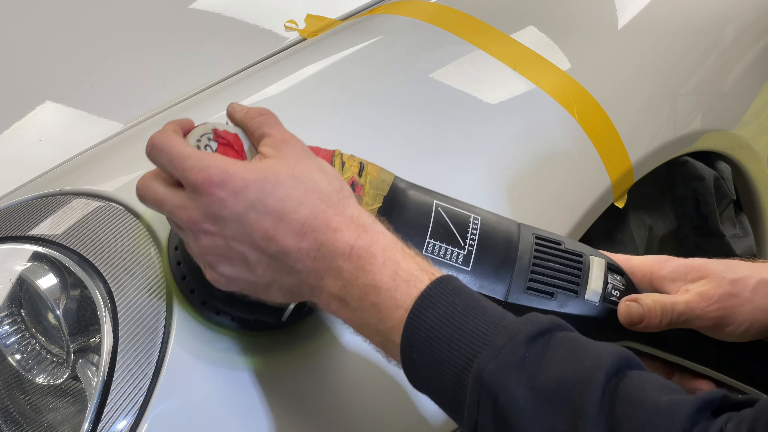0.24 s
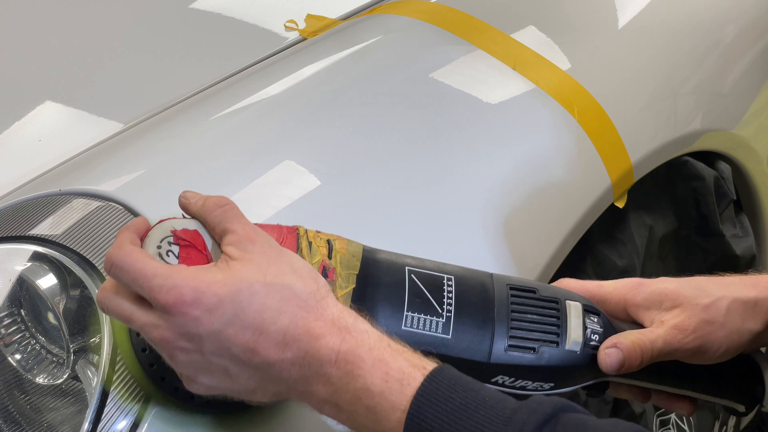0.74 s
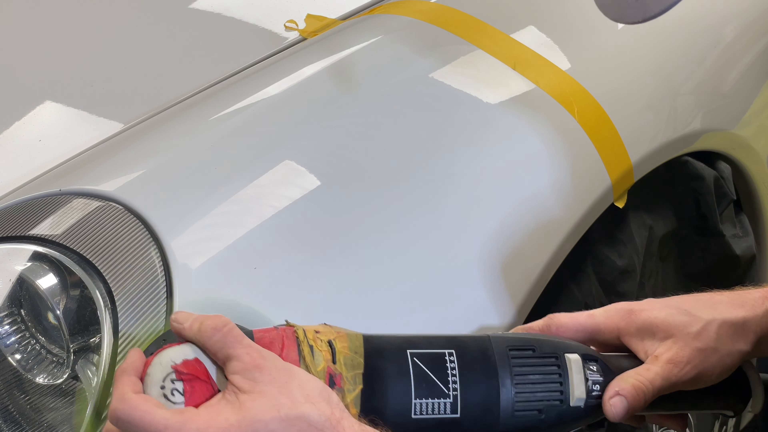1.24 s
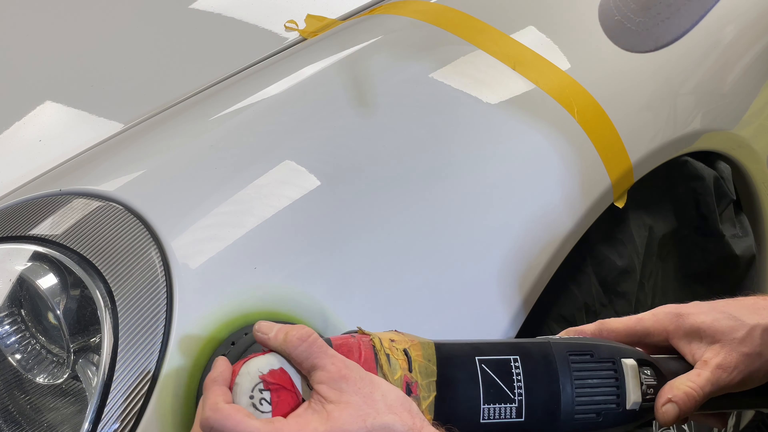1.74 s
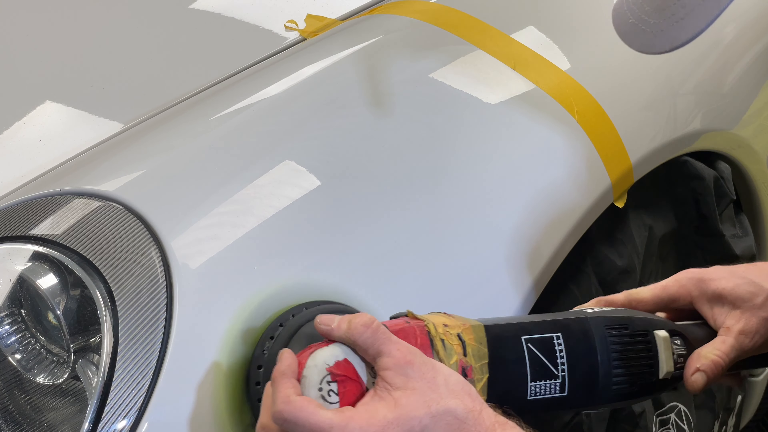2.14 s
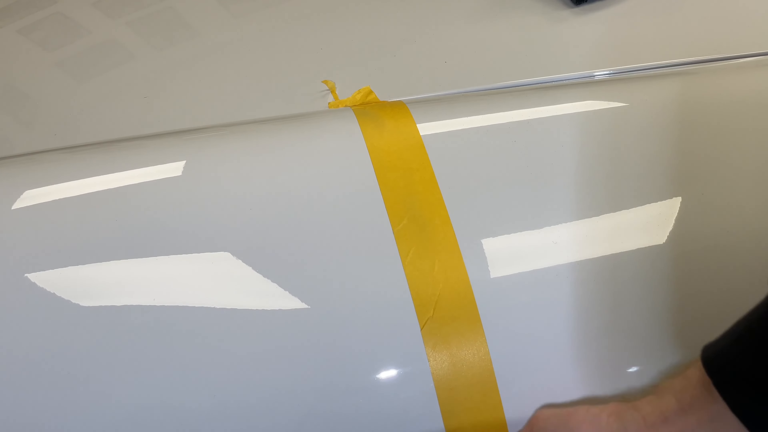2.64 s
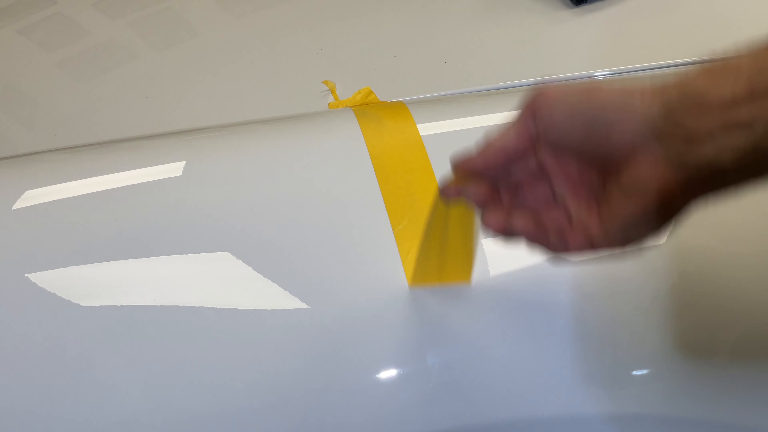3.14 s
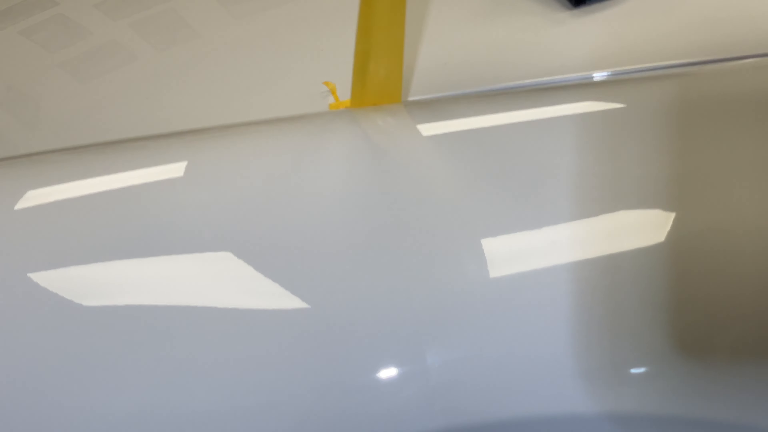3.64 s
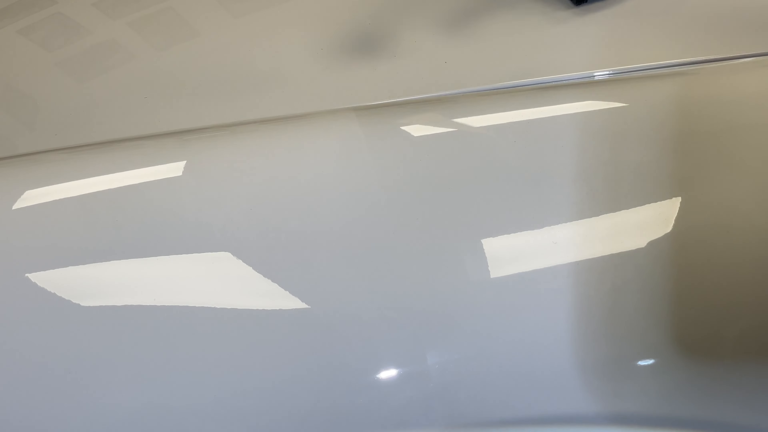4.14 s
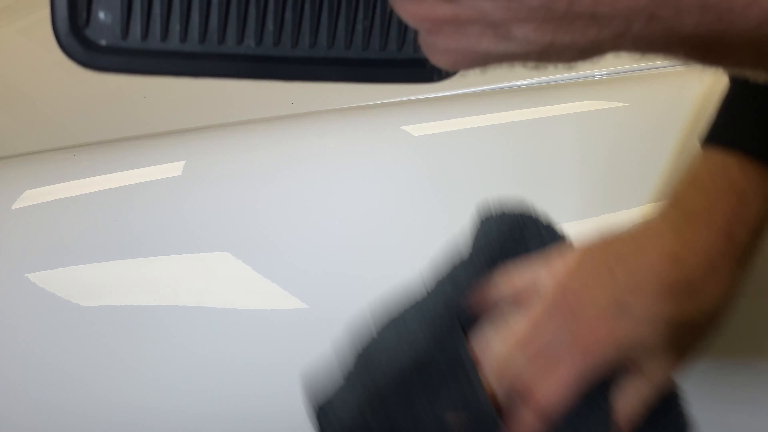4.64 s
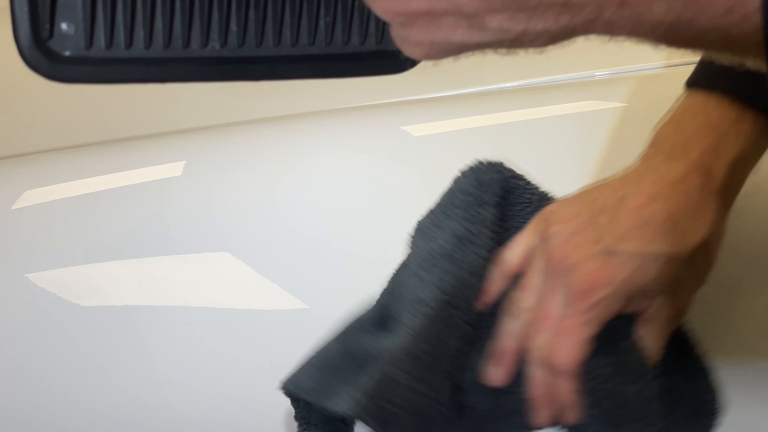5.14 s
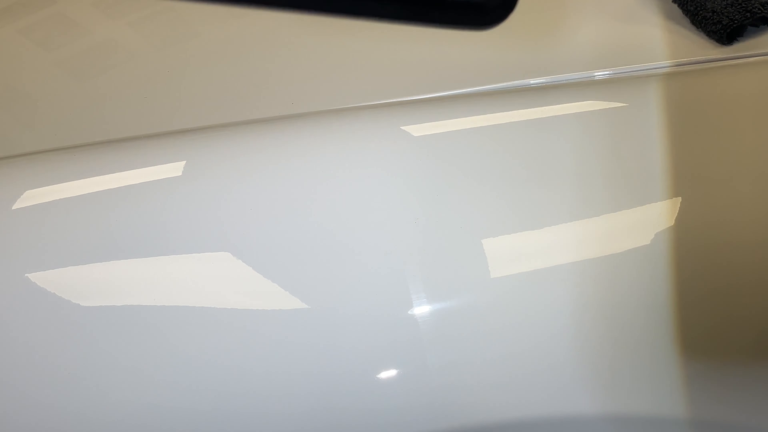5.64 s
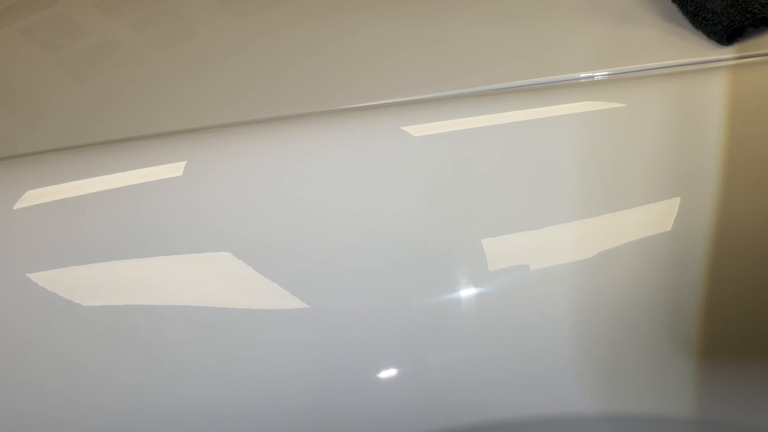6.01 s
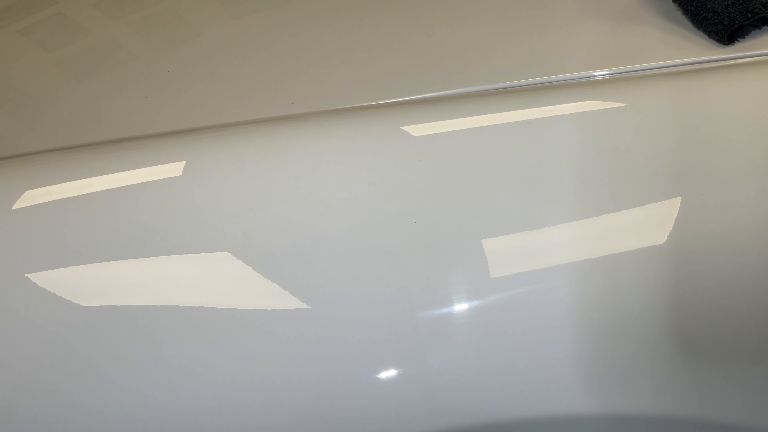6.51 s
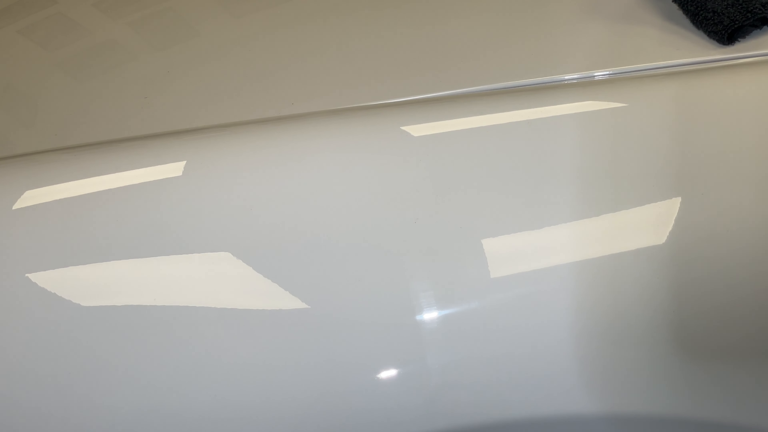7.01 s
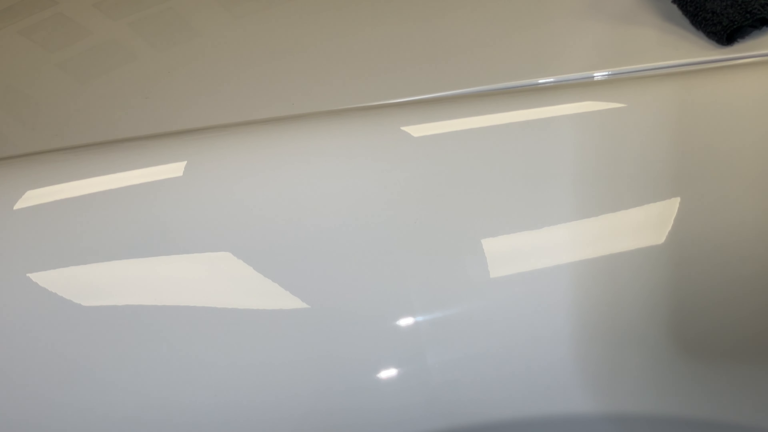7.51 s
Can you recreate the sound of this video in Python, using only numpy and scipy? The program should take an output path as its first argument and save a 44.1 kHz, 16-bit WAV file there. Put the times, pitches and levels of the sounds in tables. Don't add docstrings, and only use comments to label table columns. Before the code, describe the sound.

Steady geared whine of a car polisher stops dead, giving way to crackling tape peel, booming sheet metal, soft cloth strokes and crisp film crumpling.

```python
import sys
import numpy as np
from scipy import signal
from scipy.fft import rfft, irfft, next_fast_len
from scipy.io import wavfile
from scipy.ndimage import uniform_filter1d

SR = 44100
rng = np.random.default_rng(int(sys.argv[2]) if len(sys.argv) > 2 else 0)


def boost(x):
    u = np.asarray(x, float) / 20
    return 10 ** u


def store_pcm(level_fs):
    pcm = np.round(np.clip(level_fs, -1, 1) * 32767).astype(np.int16)
    wavfile.write(sys.argv[1], SR, np.atleast_2d(pcm).T)


N = 342657
TIME = np.arange(N) / SR
CUT_S = 2.245, 2.272
TAPE_S = 2.275, 4.24
PINION_TEETH, WHEEL_TEETH = 9, 43
PULSE_HZ = 99.85


def in_time(rows):
    s, *columns = np.transpose(rows)
    return [np.interp(TIME, s, c) for c in columns]


def window(span, fade_s=0.0046):
    return np.clip(np.minimum(TIME - span[0], span[1] - TIME) / fade_s + 0.5, 0, 1)


def at_hz(points, hz):
    point_hz, value = np.transpose(points)
    return np.interp(np.log(hz), np.log(point_hz), value)


def rms_one(x):
    return x / np.sqrt(np.mean(x ** 2) + 1e-20)


def drift(rate):
    r = np.exp(-128 * np.pi * rate / SR)
    slow = signal.lfilter([1], [1, -2 * r, r * r], rng.standard_normal(N // 64 + 1502))[1500:]
    return np.interp(np.arange(N) / 64, np.arange(len(slow)), rms_one(slow - slow.mean()))


def band_noise(order, band_hz):
    band_pass = signal.butter(order, band_hz, "band", fs=SR, output="sos")
    return rms_one(signal.sosfilt(band_pass, rng.standard_normal(N)))


def coloured(source, spectrum, shift_hz, shifts_db, patchy_db, level_band, span=(0, None)):
    out, power = np.zeros(N), 0
    edges = 28 * 2 ** np.arange(0, 9.4, 1 / 3)
    part = slice(*np.searchsorted(TIME, span)) if span[1] else slice(None)
    for k, (low, high) in enumerate(zip(edges, edges[1:])):
        hz = np.sqrt(low * high)
        band_pass = signal.butter(2, [low, high], "band", fs=SR, output="sos")
        band = boost(at_hz(spectrum, hz)) * signal.sosfilt(band_pass, source[k % 2, part])
        power += np.mean(band ** 2) * (level_band[0] < hz < level_band[1])
        place = np.interp(np.log(hz), np.log(shift_hz), range(len(shift_hz)))
        shift = sum(max(0, 1 - abs(place - i)) * s[part] for i, s in enumerate(shifts_db))
        out[part] += band * boost(shift + patchy_db * drift(17.0)[part])
    return out / np.sqrt(power)


def resonance(x, hz, width_hz):
    r = np.exp(-np.pi * width_hz / SR)
    poles = [1, -2 * r * np.cos(2 * np.pi * hz / SR), r * r]
    return signal.lfilter([(1 - r * r) / 2, 0, (r * r - 1) / 2], poles, x)


def tones(turn, orders, waver_db, blur=0.46, blur_hz=8.9):
    run, out = slice(int(CUT_S[1] * SR)), np.zeros(N)
    for k, db in orders:
        level = np.sqrt(2) * boost(db + waver_db * drift(1.9)[run])
        start = rng.uniform(0, 2 * np.pi)
        out[run] += level * np.sin(k * turn[run] + start + blur * drift(blur_hz)[run])
    return out


# (time [s], pitch [Hz])
MESH_SPEED = [(0, 2918), (.2, 2936), (.35, 2935), (.5, 2930), (.7, 2928), (.9, 2932), (1.1, 2925),
              (1.35, 2918), (1.6, 2923), (1.75, 2930), (2, 2924), (2.3, 2924)]
# (time [s], mesh [dB], vents turned away [dB], flank turned near [dB])
TOOL_MOVES = [(0.0, -36.5, -1.5, -6), (.15, -31, -1, -2.5), (.25, -30, -3.5, -8), (0.34, -26.5, 0.5, -7),
              (.52, -28, 0, -2), (0.8, -25.5, -2, -3.5), (0.92, -30.5, -4, 2), (1.1, -35, -7, 1.5),
              (1.22, -43, -9.5, 4.5), (1.34, -41, -12, 3.5), (1.45, -37, -14, 5.5), (1.72, -35, -11.5, -4),
              (1.92, -32.5, -12.5, -2), (2.1, -32.5, -10.5, -7.5), (2.25, -30.5, -9.5, -17.5)]
# (time [s], mains pulsing [0-1], orbit pulsing [0-1], neck resonance [dB], cowl resonance [dB])
GEAR_LOAD = [(0, 0.44, .2, -10, -1.5), (.2, .45, .15, -11, -1), (.5, 0, .12, -5.5, -0.5),
             (.75, 0, .15, 2, -2.5), (.95, 0.1, .3, 6, -9), (1.15, .4, .3, -0.5, -12),
             (1.4, 0, .35, -4, -8), (1.6, 0.6, .35, -2, -9), (1.85, 0.57, .2, -4, -11.5),
             (2.05, 1, .25, -11, -9.5), (2.25, 0.63, .3, -5.5, -5.5)]


def polisher():
    (mesh_hz,), (mesh_db, away_db, flank_db) = in_time(MESH_SPEED), in_time(TOOL_MOVES)
    mains_share, orbit_share, neck_db, cowl_db = in_time(GEAR_LOAD)
    mesh = 2 * np.pi * np.cumsum(uniform_filter1d(mesh_hz, size=SR // 12)) / SR
    wheel, rotor = mesh / WHEEL_TEETH, mesh / PINION_TEETH
    mains = np.cos(2 * np.pi * PULSE_HZ * TIME - 1.3 + 0.4 * drift(1.2))
    orbit = np.cos(wheel + 1.8 * drift(1.2))
    beat = (1 + mains_share * mains) * (1 + orbit_share * orbit)
    throb = 1 + 0.2 * mains_share * mains + 0.041 * orbit
    pitched = gears(mesh, wheel, beat, orbit, mesh_db, away_db) + shaft_lines(wheel, rotor, away_db, flank_db)
    noise = motor_noise(throb, away_db, neck_db, cowl_db)
    on = np.clip((CUT_S[1] - TIME) / (CUT_S[1] - CUT_S[0]), 0, 1)
    return on * (pad_orbit(wheel) + pitched + noise)


# (wheel turns [multiple], level under the mesh [dB])
MESH_SIDEBANDS = [(40, -21.5), (42, -23), (44, -16), (45, -16)]


def gears(mesh, wheel, beat, orbit, mesh_db, away_db):
    chatter = 1 + 0.15 * drift(36)
    main_whine = 2.08 * beat * chatter * np.sin(mesh + 0.14 * drift(30))
    sidebands = tones(wheel, MESH_SIDEBANDS, waver_db=2.5)
    pulsing = 1 + 0.3 * orbit + 0.4 * np.cos(np.pi * PULSE_HZ * TIME)
    second_whine = chatter * pulsing * np.sin(50 * wheel + 0.51 * drift(9.9))
    return boost(mesh_db) * (main_whine + sidebands) + 1.2 * boost(away_db - 29.5) * second_whine


# (wheel turns [multiple], level [dB])
WHEEL_LINES = [(5, -47), (6, -48.5), (7, -62), (22, -60.5), (25, -54.5)]
# (rotor turns [multiple], level [dB])
ROTOR_LINES = [(2, -47), (3, -49), (7, -49.5), (8, -54), (10, -51.5), (13, -51), (14, -50.5)]
# (rotor turns [multiple], level [dB])
FAN_LINES = [(19, -56), (20, -50.5), (21, -45.5), (22, -58)]
# (rotor turns [multiple], level [dB])
BRUSH_LINES = [(18, -48), (24, -58.5), (27, -59.5), (28, -57), (36, -58.5)]
# (rotor turns [multiple], level [dB])
FLANK_LINE = [(6, -45.5)]


def shaft_lines(wheel, rotor, away_db, flank_db):
    lines = tones(wheel, WHEEL_LINES, waver_db=2.5) + tones(rotor, ROTOR_LINES, waver_db=3.5)
    lines += boost(0.6 * away_db) * tones(rotor, FAN_LINES, waver_db=2.0, blur=0.9, blur_hz=9.8)
    lines += boost(0.6 * flank_db) * tones(rotor, BRUSH_LINES, waver_db=8.0, blur=0.9, blur_hz=14.0)
    lines += boost(flank_db) * tones(rotor, FLANK_LINE, waver_db=1.0, blur=0.8)
    lines += boost(0.73 * away_db) * tones(rotor, [(12, -38.5)], waver_db=0.0)
    return lines


# (pitch [Hz], level per Hz [dB])
MOTOR_SPECTRUM = [(100, -10), (170, -7), (300, -6.5), (650, -1), (1000, -1), (1500, -4), (2100, -9),
                  (3000, 3), (3800, -9), (5000, -6.5), (6800, -7.5), (8700, -5), (11500, -12.5),
                  (15000, -30)]
# (pitch [Hz], width [Hz], level [dB])
CASE_RESONANCES = [(626, 76, -0.5), (751, 26, 3), (2150, 540, -5.5), (2865, 290, 1.5), (3685, 440, 0.5)]
# (time [s], level [dB])
CASE_FACING = [
    (0, -1.5),
    (.25, -1.5),
    (.9, -2),
    (1.3, -1),
    (1.7, -0.5),
    (1.9, 0.5),
    (2.2, 0),
]


def motor_noise(throb, away_db, neck_db, cowl_db):
    swing_db = away_db - away_db[:int(CUT_S[0] * SR)].mean()
    swings = [share * swing_db for share in (0.048, -0.017, 0.45, 0.1)]
    swings[1] = swings[1] + in_time(CASE_FACING)[0]
    source = throb * rng.standard_normal((2, N))
    noise = coloured(source, MOTOR_SPECTRUM, [800, 2050, 3400, 6500], swings, 0.9, (400, 1300), (0, 2.3))
    noise = noise + sum(resonance(noise, hz, width) * boost(db + 1.5 * drift(1.4))
                        for hz, width, db in CASE_RESONANCES)
    noise = noise + boost(neck_db) * resonance(noise, hz=4240, width_hz=150)
    noise = noise + boost(cowl_db) * resonance(noise, hz=6550, width_hz=390)
    return boost(-35.5) * noise


# (time [s], edge pressure [dB], seating [dB])
PAD_ROCKING = [
    (0.0, 0, -7),
    (0.42, 1.3, -15),
    (0.6, -3.5, -1.5),
    (0.86, -10, -4.5),
    (1.3, -4.5, -3),
    (1.7, -3.5, -5),
    (1.9, -0.5, 1),
    (2.0, -5, -1),
    (2.25, -7.5, 0.5),
]
# (wheel turns [multiple], level [dB], share of edge pressure, share of seating)
PAD_ORDERS = [(1, -27.5, -0.05, 0.098), (2, -34.5, 0.76, .01), (3, -38, -0.014, 0.96), (4, -44, 1.5, 0.51)]


def pad_orbit(wheel):
    edge_db, seating_db = in_time(PAD_ROCKING)
    pad = np.zeros(N)
    for k, db, edge, seated in PAD_ORDERS:
        level = np.sqrt(2) * boost(db + edge * edge_db + seated * seating_db)
        pad -= level * np.sin(k * wheel + 0.15 * (k - 1) * drift(1.0))
    return pad


def strokes(rows, linger=0.0):
    rows, t = np.array(rows), TIME[::32]
    late = t - rows[:, :1]
    swell_s, fade_s = np.maximum(rows[:, 2:3], 0.004), np.maximum(rows[:, 3:4], 0.004)
    gone = np.maximum(-late / swell_s, late / fade_s)
    down_db = -20 * 2.31 * np.log10(np.maximum(1 - gone, 0.002))
    power = boost(2 * (rows[:, 1:2] - down_db))
    breadths = rows[:, -1:] + linger * np.minimum(down_db, 30)
    breadth = np.sum(power * breadths, axis=0) / power.sum(axis=0)
    return np.interp(TIME, t, 10 * np.log10(power.sum(axis=0))), np.interp(TIME, t, breadth)


def grains(per_s, spread_db):
    sizes = boost(spread_db * np.minimum(rng.exponential(1, N), 4)) * (rng.random(N) < per_s / SR)
    return np.array([rms_one(sizes * rng.standard_normal(N)) for _ in range(2)])


def rubbing(rows, span, law, spectrum, per_s, spread_db):
    level_db, breadth = strokes(rows, law[2])
    tilts = [law[0] * breadth, 0 * breadth, law[1] * breadth]
    slips = coloured(grains(per_s, spread_db), spectrum, [600, 2700, 6700], tilts, 1.57, (1500, 5000),
                     (span[0] - 0.1, span[1] + 0.1))
    return window(span) * boost(level_db) * slips


# (peak time [s], level [dB], swell [s], fade [s], breadth [dB])
TAPE_PULLS = [(2.37, -58, 0.34, 0.12, -4.5), (2.559, -72, 0.16, 0.085, 15), (2.7, -88.5, 0.26, 0.12, 28.5),
              (2.79, -69.5, 0.11, 0.18, 20.5), (2.893, -57, 0.15, 0.64, 9), (3.26, -43, 0.41, 0.31, 9),
              (3.39, -47, 0.37, 0.06, 7.5), (3.43, -63, .05, .08, 6), (3.53, -46.5, .07, 0.12, -2),
              (3.6, -45, 0.24, 0.13, 5), (3.75, -64, 0.35, 0.31, 3.5), (3.779, -54.5, 0.043, 0.017, 4.5),
              (3.839, -55, 0.041, 0.13, 4), (4.003, -48.5, 0.19, 0.033, 2.5),
              (4.019, -41, 0.029, 0.037, 7.5), (4.047, -37, 0.034, 0.062, 1), (4.1, -58.5, .05, 0.11, 8),
              (4.17, -66, .08, 0.12, 0)]
# (pitch [Hz], level per Hz [dB])
TAPE_SPECTRUM = [(100, -13), (200, -6.5), (400, -10), (800, -8.5), (1600, -8.5), (3000, -8), (5000, -13),
                 (7500, -18.5), (9000, -8.5), (12000, -27), (15000, -30)]


def tape():
    return rubbing(TAPE_PULLS, TAPE_S, (0.97, 0.29, 0.15), TAPE_SPECTRUM, per_s=5800, spread_db=0.0)


def snap_train(rows):
    out, n = np.zeros(N + 2048), np.arange(2048) / SR
    high = signal.butter(2, [5500, 15000], "band", fs=SR, output="sos")
    for s, db, hz, treble_db, decay_ms, noise_share in rows:
        burst = np.where(n < 2 / SR, 1.6, noise_share * rng.standard_normal(2048))
        fall = np.exp(-n * 1000 / decay_ms)
        crack = 1.6 * resonance(resonance(burst * fall, hz, 0.85 * hz), hz, 0.68 * hz)
        ringing = 0.356 * np.sin(2 * np.pi * hz * n) * fall ** 1.2
        tick = boost(treble_db + 20.5) * signal.sosfilt(high, burst * fall ** 2)
        first = round(s * SR)
        out[first:first + 2048] += boost(db + 5.0) * (crack + ringing + tick)
    return out[:N]


# (time [s], peak [dB], ring [Hz], relative treble [dB])
SNAP_EVENTS = [
    (3.5989, -30.5, 3300, -17),
    (4.0156, -19.5, 3200, -21),
    (4.0432, -33, 4630, -10),
    (4.049, -25, 4140, -10),
    (4.4724, -36.5, 2860, -26),
    (5.2054, -60.5, 3840, -17.5),
    (5.45, -61, 5000, -11),
    (5.482, -48.5, 2700, -18.5),
    (5.6237, -39.5, 3370, -11),
]


def snaps():
    return snap_train([(*snap, 1.67, 0.7) for snap in SNAP_EVENTS])


# (time [s], peak [dB], ring [Hz])
TAP_EVENTS = [(2.404, -38, 525), (2.868, -48, 404), (2.901, -42, 450), (3.081, -36, 870),
              (3.498, -40, 1080), (3.765, -57, 1110), (3.963, -45, 1110), (4.267, -53, 1100),
              (4.291, -54, 1040), (4.473, -34.5, 890), (4.552, -55, 1750), (4.825, -43, 513),
              (4.963, -58, 2210), (5.481, -43, 786), (5.592, -57, 1290)]


def taps():
    return snap_train([(*tap, -47.5, 3.4, 0.7) for tap in TAP_EVENTS])


# (peak time [s], drumming [dB], swell [s], fade [s])
PANEL_PUSHES = [
    (2.42, -51, 0.12, 0.17),
    (2.86, -43, 0.1, 0.95),
    (3.36, -47, 0.48, 0.17),
    (3.63, -42, 0.49, 0.15),
    (4.07, -37.5, 0.14, 0.21),
    (4.47, -49, 0.022, 0.24),
    (4.84, -48, 0.089, 0.16),
    (4.94, -64, 0.11, 0.24),
    (5.5, -51, 0.15, 0.17),
    (5.72, -68, 0.05, 0.035),
]
# (peak time [s], level [dB], swell [s], fade [s])
GLUE_TUGS = [
    (2.88, -58, .05, 0.12),
    (3.11, -45.5, 0.066, 0.042),
    (3.21, -44, 0.046, .05),
    (3.27, -42, 0.038, 0.16),
    (3.355, -43, 0.052, 0.045),
    (3.41, -48, 0.028, 0.039),
    (3.53, -47.5, .03, 0.049),
    (3.575, -43, 0.045, 0.041),
    (3.615, -45, 0.024, 0.065),
    (5.49, -52, 0.039, .06),
]
# (time [s], strength [dB], pitch [Hz], early pitch excess, t60 [s])
PANEL_KNOCKS = [(2.383, -41.5, 61, 0.28, 0.14), (4.013, -33.5, 73.7, 5.0, 0.57),
                (4.056, -24, 61.5, 0.62, 0.43), (4.825, -35.5, 113.4, 0.76, 0.14),
                (5.477, -49, 124, 2.5, 0.27), (2.766, -43, 64, 0.33, 0.23), (3.379, -33, 136, 0.27, 0.24),
                (4.851, -46.5, 70.2, .3, .35), (4.929, -50, 142, .3, 0.52), (5.449, -43, 81, 0.27, 0.17),
                (5.507, -43, 144.7, .2, 0.36)]


def panel():
    drum = boost(strokes(PANEL_PUSHES)[0] - 3.0) * band_noise(2, [100, 270])
    drum += boost(strokes(GLUE_TUGS)[0]) * band_noise(2, [258, 522])
    for s, db, hz, excess, t60 in PANEL_KNOCKS:
        t = np.maximum(TIME - s, 0)
        cycles = hz * (t + excess * 0.0091 * (1 - np.exp(-t / 0.013)))
        drum += boost(db - 60 * t / t60) * (1 - np.exp(-t / 0.0052)) * np.sin(2 * np.pi * cycles)
    return drum


# (peak time [s], level [dB], swell [s], fade [s], breadth [dB])
CLOTH_WIPES = [(4.275, -66, 0.044, 1, 5), (4.475, -50, 0.04, 0.069, 3), (4.553, -68, .2, 0.62, 6.5),
               (4.78, -66.5, 0.17, 0.14, 1), (4.977, -65, 0.25, 0.072, 0.5), (5.05, -68, 0.15, 0.46, 3),
               (5.27, -72.5, 0.26, 0.042, 7), (5.484, -65, 0.082, 0.12, 13), (5.622, -57, 0.11, 0.095, -1),
               (5.68, -62.5, 0.13, 0.46, 1), (5.834, -55.5, 0.13, 0.2, 3)]
# (pitch [Hz], level per Hz [dB])
CLOTH_SPECTRUM = [(100, -6.5), (200, -22), (400, -18.5), (800, -15.5), (1600, -16), (3000, -15.5),
                  (5000, -23), (7500, -25.5), (9000, -25.5), (12000, -24), (15000, -61)]


def cloth():
    return rubbing(CLOTH_WIPES, (4.245, 5.98), (1.14, 0.38, 0.14), CLOTH_SPECTRUM, per_s=6800, spread_db=-1.0)


# (peak time [s], level [dB], swell [s], fade [s], breadth [dB])
WRAP_MOVES = [
    (5.845, -74, 0.013, 0.24, 30.5),
    (5.996, -61.5, 0.049, 0.71, 7.5),
    (6.108, -55.5, 0.038, 0.022, 16),
    (6.128, -49.5, 0.0086, 0.1, 6.5),
    (6.242, -51, 0.0062, 0.15, -9.5),
    (6.416, -47.5, 0.32, 0.11, -3),
]
# (pitch [Hz], level per Hz [dB])
WRAP_SPECTRUM = [(200, -18), (800, -1.5), (1600, 1.5), (2500, 3.5), (3300, 1.5), (5000, -4), (7500, -8.5),
                 (9000, 0.5), (12000, -11), (15000, -31)]


def wrapper():
    return rubbing(WRAP_MOVES, (5.8, 6.53), (0.37, 0.78, 0.093), WRAP_SPECTRUM, per_s=8200, spread_db=-1.5)


# (time [s], peak [dB], ring [Hz], relative treble [dB])
CREASE_POPS = [(5.968, -52, 5200, -15), (5.992, -39.5, 3320, -22), (6.008, -42.5, 1900, -16.5),
               (6.031, -40, 2900, -20), (6.034, -45, 2600, -22), (6.0872, -44, 3600, -26),
               (6.096, -42, 4000, -14.5), (6.1022, -35.5, 4500, -12.5), (6.1072, -34.5, 4500, -13),
               (6.1087, -39, 7000, -13.5), (6.1268, -39, 5000, -8.5), (6.132, -43, 6600, -22),
               (6.134, -40, 6500, -21), (6.1372, -36.5, 2000, -26), (6.141, -39, 5000, -22),
               (6.150, -46, 5200, -22), (6.2085, -40.5, 4200, -15), (6.242, -44, 3500, -21),
               (6.242, -46, 1100, -30), (6.249, -46, 3600, -26), (6.2535, -42.5, 3000, -29),
               (6.3526, -44, 6800, -6.5), (6.383, -46, 2000, -22), (6.4114, -38, 4300, -26)]


def crease_pops():
    return snap_train([(*pop, 1.67, 0.7) for pop in CREASE_POPS])


# (peak time [s], level [dB], swell [s], fade [s], breadth [dB])
CRINKLE_MOVES = [
    (6.62, -66.5, 0.69, 0.45, -3),
    (6.8, -69, 0.38, 0.46, -7.5),
]
# (pitch [Hz], level per Hz [dB])
CRINKLE_SPECTRUM = [(200, 7), (500, -1), (1200, -9), (2300, -9.5), (3500, -1.5), (5000, -9), (7500, -15),
                    (12000, -8), (15000, -37)]


def crinkle():
    return rubbing(CRINKLE_MOVES, (6.4, 7.15), (-0.27, 1.26, 0.061), CRINKLE_SPECTRUM, per_s=6000, spread_db=-1.5)


# (time [s], peak [dB], ring [Hz])
RELAX_TICKS = [(6.561, -51, 4340), (6.5779, -52, 3100), (6.5869, -55, 3060), (6.59, -52, 2820),
               (6.5954, -56, 3120), (6.6106, -46, 3180), (6.6134, -52, 3550), (6.639, -43.5, 3100),
               (6.6524, -52, 3050), (6.6614, -51, 3370), (6.6734, -57, 3500), (6.6884, -50, 3240),
               (6.6964, -57, 3240), (6.715, -50, 4000), (6.743, -44.5, 2910), (6.7544, -56, 3030),
               (6.7644, -57, 3660), (6.7735, -49.5, 3150), (6.7944, -57, 2560), (6.8174, -56, 3260),
               (6.8826, -49, 2550)]


def relax_ticks():
    return snap_train([(s + 0.001, db + 2.0, hz, -32, 0.63, 0.3) for s, db, hz in RELAX_TICKS])


# (peak time [s], level [dB], swell [s], fade [s])
HIGH_HISS_SWELLS = [
    (2.36, -61.5, 0.13, 0.13),
    (2.557, -66.5, 0.057, 0.032),
    (2.8, -60, 0.23, 0.11),
]


def high_hiss():
    return window(TAPE_S) * boost(strokes(HIGH_HISS_SWELLS)[0]) * band_noise(3, [9400, 15400])


# (pitch [Hz], level per Hz [dB])
AIR_SPECTRUM = [(40, -6), (60, 2), (110, -16), (250, -16), (400, -24.5), (700, -35.5), (1200, -45.5),
                (3000, -56.5), (6000, -62), (9000, -54.5), (12000, -54), (15000, -66)]


def garage():
    return boost(-56) * coloured(rng.standard_normal((2, N)), AIR_SPECTRUM, [100], [0 * TIME], 0.77, (30, 2000))


# (pitch [Hz], share of power [0-1])
DIRECT_SHARE = [(60, .998), (130, .98), (250, .98), (450, .96), (700, .93), (1250, .95), (1500, .98),
                (2200, .98), (2500, .97), (5500, .9), (7400, .87), (8300, 1), (9200, 1), (10300, .87),
                (11900, .87), (12400, .992)]
# (pitch [Hz], left over right [dB])
LEFT_OVER_RIGHT = [(60, 1.5), (110, 4), (170, -4), (270, -1), (450, 1), (1500, -0.05)]


def ports(x, turn_rows, tail_s=0.0055):
    size = next_fast_len(N + 8192)
    hz = np.maximum(np.fft.rfftfreq(size, 1 / SR), 1)
    turn = np.interp(hz, *np.transpose(turn_rows))
    direct = np.clip(at_hz(DIRECT_SHARE, hz), 0, 1)
    walls = rng.standard_normal((2, 4096)) * np.exp(-np.arange(4096) / SR / tail_s)
    walls = rfft(walls / np.linalg.norm(walls, axis=1, keepdims=True), size)
    shifting = np.cumsum(drift(4.715)) * 60 / SR
    dry_spectrum = rfft(x, size)
    echoes = irfft(dry_spectrum * walls, size)[:, :N]
    echo = rfft(echoes[0] * np.cos(shifting) + echoes[1] * np.sin(shifting), size)
    heard = []
    for side in (1, -1):
        mixed = np.sqrt(direct) * dry_spectrum + side * np.sqrt(1 - direct) * echo
        balance = boost(side * at_hz(LEFT_OVER_RIGHT, hz) / 2)
        heard.append(mixed * np.exp(0.5j * side * turn) * balance)
    return irfft(np.array(heard), size)[:, :N]


# (pitch [Hz], left leads [radians])
POLISHER_TURN = [(0, 0), (2200, 0), (3200, .45), (5200, .35), (5750, -1.4), (6500, -.75), (7100, -1.1),
                 (7500, -2.2), (8250, -2.5), (8300, -np.pi), (9150, -np.pi), (10000, -3.6), (10400, -4.1),
                 (11700, -5.1), (12300, -2 * np.pi)]
# (pitch [Hz], left leads [radians])
HAND_WORK_TURN = [(0, 0), (2200, 0), (3200, .45), (5200, .35), (5750, -1.2), (6500, -.75), (7100, -1.1),
                  (7500, -1.9), (8250, -2.3), (8500, -2.9), (8800, -np.pi), (9200, -3.7), (10000, -4.1),
                  (11000, -4.7), (11700, -5.2), (12300, -2 * np.pi)]
DIP_S = 4.21, 4.24, 4.27


def scene():
    dip = np.interp(TIME, DIP_S, [1, 0.12, 1])
    rubbed = tape() + cloth() + wrapper() + crinkle() + high_hiss()
    snapped = snaps() + taps() + crease_pops() + relax_ticks()
    near = rubbed + snapped + dip * (panel() + garage())
    return ports(polisher(), POLISHER_TURN) + ports(near, HAND_WORK_TURN)


def band_limit(x):
    return signal.sosfilt(signal.butter(12, 16510, fs=SR, output="sos"), x)


def record(dry):
    top_cut = signal.cheby2(20, 50, 15900 * 1.012, fs=SR, output="sos")
    mix = signal.sosfilt(top_cut, dry)
    return band_limit(mix)


dry = scene()
out = record(dry)
store_pcm(out)
```